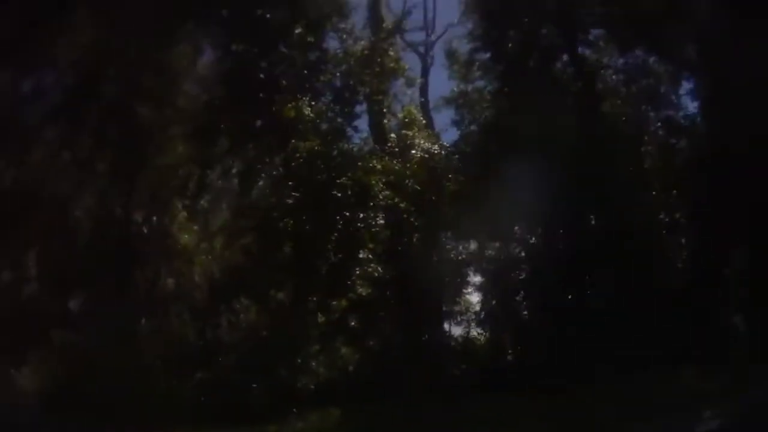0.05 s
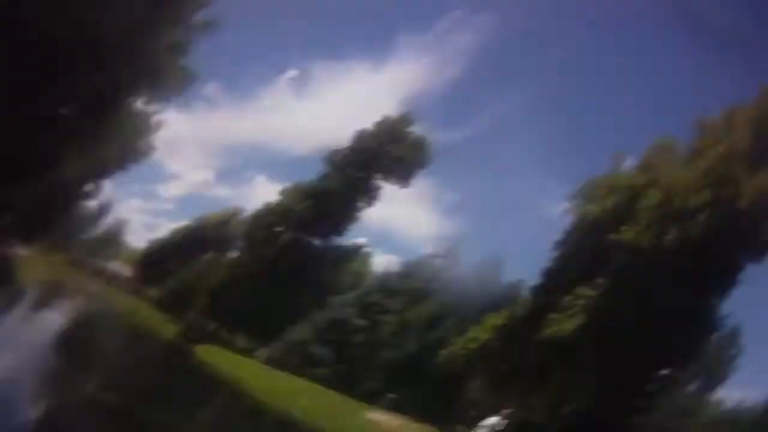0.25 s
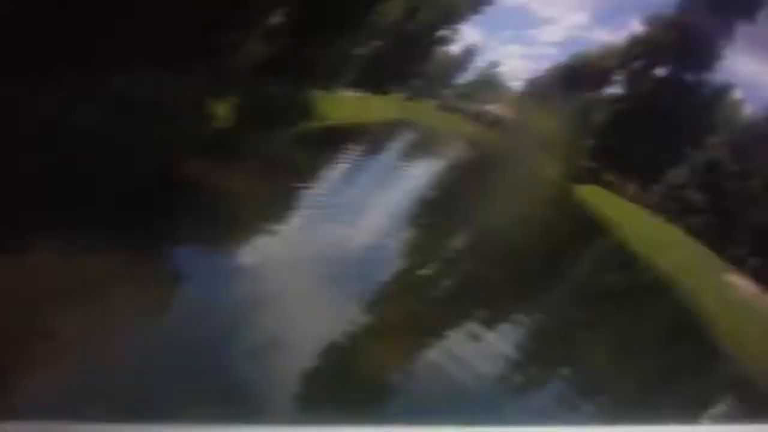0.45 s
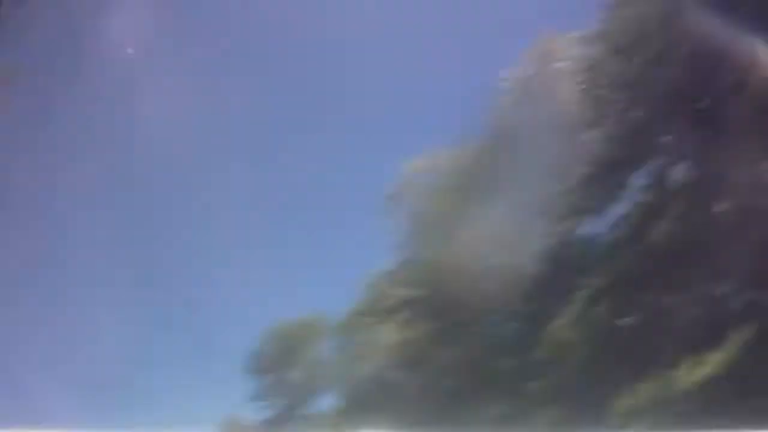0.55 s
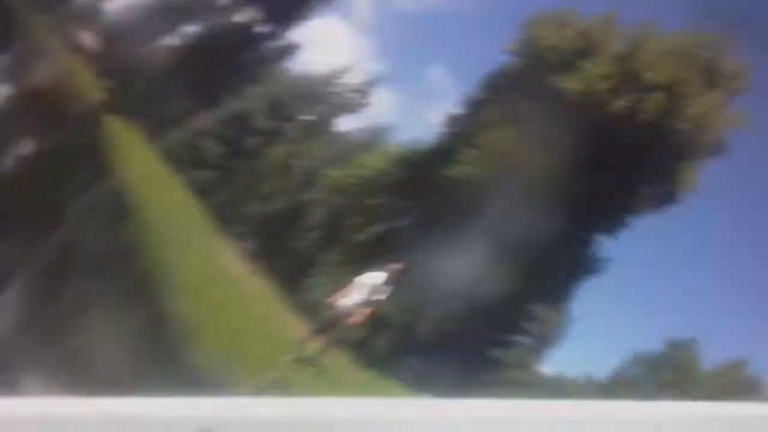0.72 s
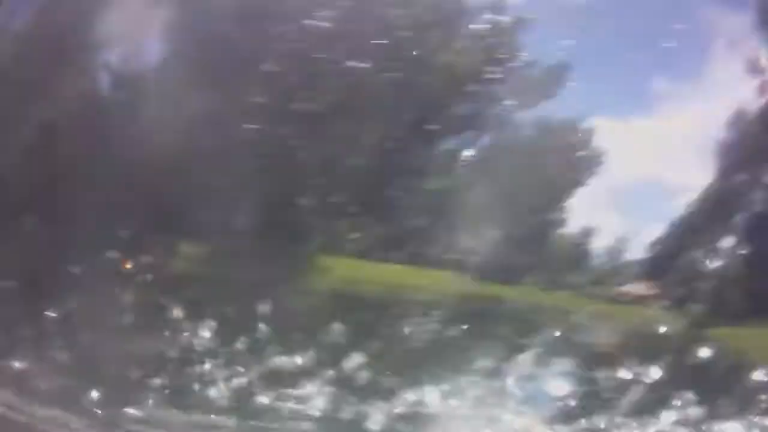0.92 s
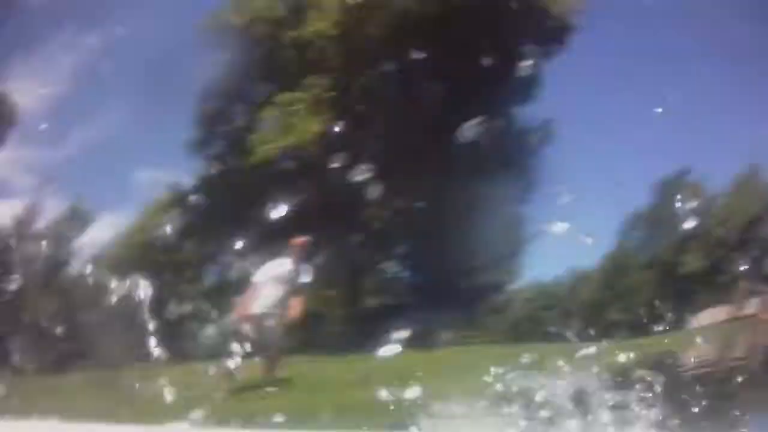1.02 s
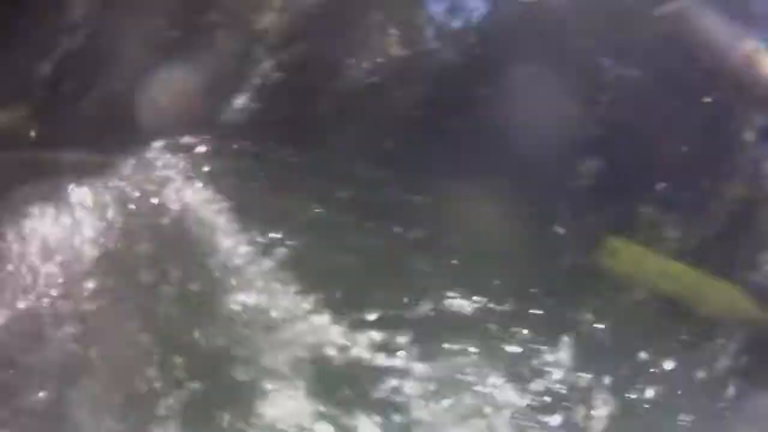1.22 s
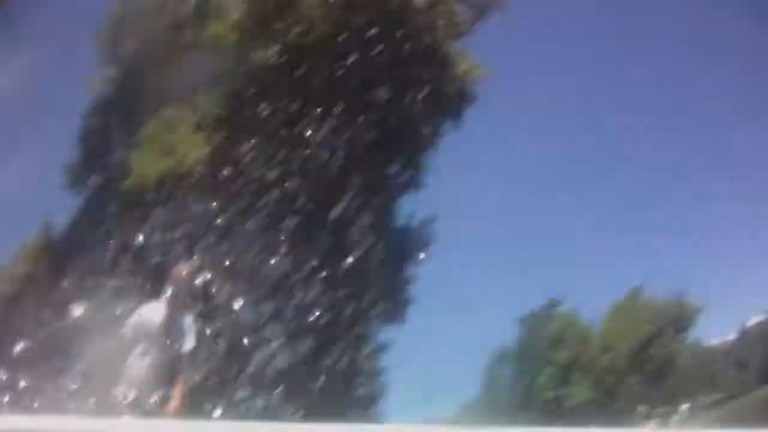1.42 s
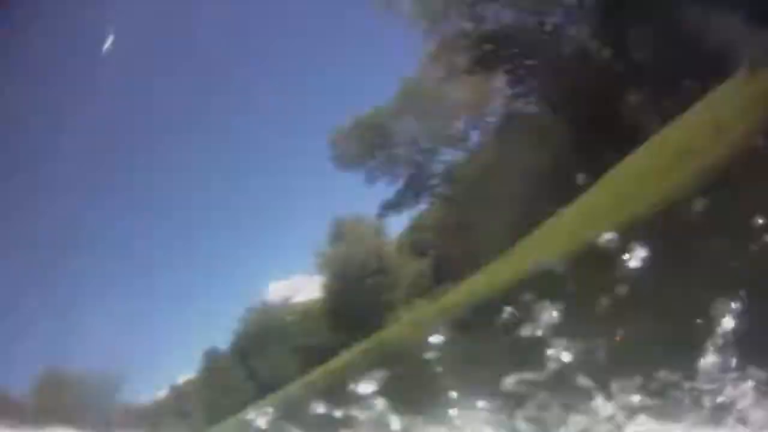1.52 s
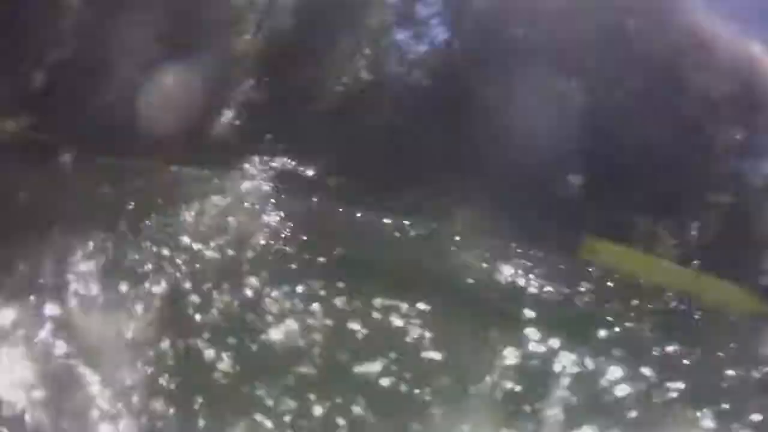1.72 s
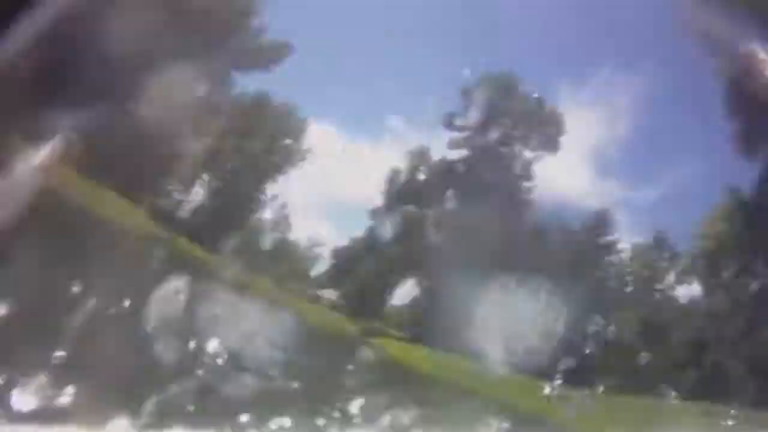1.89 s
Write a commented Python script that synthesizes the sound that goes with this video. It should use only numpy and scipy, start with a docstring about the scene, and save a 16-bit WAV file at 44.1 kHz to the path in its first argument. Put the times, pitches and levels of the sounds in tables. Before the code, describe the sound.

Water slaps a plastic shell skipping over a pond, very close. Near silence with tiny ticks until 0.2 s, then a rattling burst of slaps, with a short sinking gulp at 0.25. Fluttering wind swells 0.35-0.7. The loudest, clipped smack hits at 0.75, crackly slaps at 0.98 and 1.03. Then faint gurgle, spray and wavering motor hum; plops at 1.47-1.51, small splash near 1.75, gurgle at 1.9.

```python
"""Pond, right at the water: a camera rides on a small motor-driven boat that skips over the surface.
Each contact slaps the microphone port (pressure, suction), ticks the plastic shell (ringing modes)
and churns water over the port (noise choked in snatches); trapped air gulps on a sinking note.
Between contacts air buffets the port (coloured noise), spray patters (random impulses), bubbles ring,
the hull thumps and gurgles, the wake splashes and the motor hums faintly (shaft-rate harmonics)."""
import sys
import numpy as np
from scipy import signal
from scipy.fft import rfft, irfft
from scipy.io import wavfile
from scipy.ndimage import uniform_filter1d

SR = 44100
rng = np.random.default_rng(int(sys.argv[2]) if len(sys.argv) > 2 else 0)


def store_wav(level_fs):
    """Save 16-bit WAV to argv[1]."""
    pcm = np.round(np.clip(np.atleast_2d(level_fs), -1, 1) * 32767)
    wavfile.write(sys.argv[1], SR, pcm.T.astype(np.int16))


N = 85995


def undb(db):
    """Decibels to amplitude gain."""
    return 10 ** (np.asarray(db) / 20)


def unit(x):
    """Scale to rms 1."""
    return x / np.sqrt(np.mean(x ** 2))


def clock(start_s=0):
    """Seconds since start_s, negative before it."""
    return np.arange(N) / SR - start_s


def fader(curve):
    """Gain along (time_s, level_db) points, linear in dB."""
    return undb(np.interp(clock(), *np.array(curve).T))


def colour(x, spectrum):
    """Minimum-phase filter through (freq_hz, relative_db) points; rms 1."""
    hz, db = np.array(spectrum).T
    bin_hz = np.arange(N + 1) * SR / (2 * N)
    gain = undb(np.interp(np.log(bin_hz + 1), np.log(hz), db))
    # folding the cepstrum onto positive time makes the filter causal
    cepstrum = irfft(np.log(gain))
    cepstrum[1:N] *= 2
    cepstrum[N + 1:] = 0
    response = np.exp(rfft(cepstrum))
    return unit(irfft(rfft(x, 2 * N) * response)[:N])


def noise(spectrum):
    """Coloured Gaussian noise, rms 1."""
    return colour(rng.standard_normal(N), spectrum)


def walk(points_per_s):
    """Straight lines between Gaussian points; spread near 1."""
    return np.interp(clock() * points_per_s, np.arange(N), rng.standard_normal(N))


# steady noise floor: freq_hz, relative_db
FLOOR_SPECTRUM = [(30, 1), (90, 1), (300, -17), (600, -5.5), (1200, -16), (3000, -28.5), (5000, -49),
                  (6800, -14), (9000, -19), (15500, -19)]
# its left-right difference: freq_hz, relative_db
FLOOR_SIDE_SPECTRUM = [(100, -31), (1000, -5), (3000, -16), (8000, -6), (15000, 1)]
FLOOR_DB, FLOOR_SIDE_DB = -69, -78


def noise_floor():
    """Steady hiss as coloured noise; returns mid, side."""
    return undb(FLOOR_DB) * noise(FLOOR_SPECTRUM), undb(FLOOR_SIDE_DB) * noise(FLOOR_SIDE_SPECTRUM)


# spectra of airflow, hiss and buffeting: freq_hz, relative_db
AIRFLOW_SPECTRUM = [(20, -19), (65, -16), (110, -3.5), (210, -4.5), (330, 0), (420, -9), (640, -16),
                    (1000, -34.5), (2500, -41), (14000, -83)]
HISS_SPECTRUM = [(300, -13), (900, 1.5), (1500, 0.5), (2450, 1), (3300, -7.5), (4300, -7.5), (4900, -24),
                 (7000, -24.5), (14000, -54)]
BUFFET_SPECTRUM = [(20, -46.5), (60, -1), (110, 4), (200, 3), (350, -20), (560, -20), (900, -32.5),
                   (3000, -57)]
# their levels: time_s, level_db
AIRFLOW_LEVEL = [(0, -80), (.09, -66), (.12, -53.5), (.19, -49.5), (.22, -49), (.32, -41.5), (.345, -31.5),
                 (.385, -41), (.42, -32.5), (.468, -26.5), (.505, -33), (.54, -37), (.61, -37.5),
                 (.668, -31.5), (.69, -41), (.74, -48), (.92, -41.5), (.96, -45.5), (1.1, -49), (1.25, -55),
                 (1.95, -90)]
HISS_LEVEL = [(.08, -76), (.14, -58.5), (.31, -58.5), (.36, -48.5), (.46, -52), (.56, -52.5), (.665, -46),
              (.695, -71), (.92, -61), (.97, -50.5), (1.1, -67), (1.25, -74)]
BUFFET_LEVEL = [(0, -74), (.3, -47), (.71, -51), (.85, -34.5), (.92, -38), (.96, -33), (1.09, -45),
                (1.18, -39), (1.27, -48.5), (1.33, -43), (1.42, -54), (1.54, -66.5), (1.62, -53),
                (1.69, -39), (1.77, -56), (1.95, -72)]
AIR_FLUTTER_DB = 4


def wind():
    """Air rushing past the port: fluttering flow, hiss and low buffeting."""
    flow = fader(AIRFLOW_LEVEL) * noise(AIRFLOW_SPECTRUM) * undb(AIR_FLUTTER_DB * walk(70))
    hiss = fader(HISS_LEVEL) * noise(HISS_SPECTRUM)
    buffet = fader(BUFFET_LEVEL) * noise(BUFFET_SPECTRUM)
    return flow + hiss + buffet


DROPS_PER_S, DROP_SPREAD_DB = 3500, 4
MIST_SHARE = 0.44  # amplitude against the drops
PATTER_FLUTTER_DB = 3.5


def patter(spectrum):
    """Countless droplets of uneven size as random impulses, over a fine mist of noise."""
    hits = rng.random(N) < DROPS_PER_S / SR
    size_db = DROP_SPREAD_DB * np.minimum(rng.exponential(size=N), 5)
    drops = hits * rng.choice([-1, 1], N) * undb(size_db)
    mixed = unit(colour(drops, spectrum) + MIST_SHARE * noise(spectrum))
    return mixed * undb(PATTER_FLUTTER_DB * walk(60))


# falling spray: freq_hz, relative_db
SPRAY_SPECTRUM = [(530, -30), (900, -34), (1620, 2), (1800, -23), (2360, 5.5), (2820, -2.5), (3650, -1),
                  (4160, 6), (4850, -11), (5780, -3), (7150, -6.5), (10700, -30), (15000, -42)]
# falling spray: time_s, level_db
SPRAY_LEVEL = [(0, -71), (.09, -74), (.13, -64), (.21, -55), (.32, -62.5), (.72, -68.5), (.93, -61),
               (1.0, -62), (1.08, -51.5), (1.15, -50.5), (1.22, -55), (1.3, -62.5), (1.36, -52.5),
               (1.44, -56.5), (1.62, -54), (1.69, -54), (1.745, -42), (1.81, -56.5), (1.95, -57.5)]
SPRAY_SIDE = 0.05  # amplitude against the mid


def spray():
    """Drops patter back onto the pond, with a faint independent side; returns mid, side."""
    level = fader(SPRAY_LEVEL)
    return level * patter(SPRAY_SPECTRUM), SPRAY_SIDE * level * patter(SPRAY_SPECTRUM)


BUBBLE_LOW_HZ, BUBBLE_HIGH_HZ = 1068, 5130
BUBBLE_DECAY_CYCLES, BUBBLE_RISE = 10.2, 0.0397  # rise: phase gained per decay time, as a share
BUBBLE_DB = -5  # against the spray level
BUBBLE_TILT_DB, BUBBLE_RANGE_DB = 10, 27


def bubbles():
    """Small bubbles of every size ring briefly and rise in pitch, as loud as the spray allows."""
    out = np.zeros(N + 2048)
    t = np.arange(2048) / SR
    for when, smallness, faintness in rng.random((260, 3)):
        hz = BUBBLE_LOW_HZ * (BUBBLE_HIGH_HZ / BUBBLE_LOW_HZ) ** smallness
        age = t * hz / BUBBLE_DECAY_CYCLES
        envelope = np.exp(-age) * (1 - np.exp(-6 * age))
        ring = np.sin(2 * np.pi * hz * t * (1 + BUBBLE_RISE * np.minimum(age, 4))) * envelope
        start = int(when * N)
        level_db = BUBBLE_TILT_DB * smallness - BUBBLE_RANGE_DB * faintness
        out[start:start + len(t)] += undb(level_db) * ring
    return fader(SPRAY_LEVEL) * undb(BUBBLE_DB) * unit(out[:N])


# hard drops on the shell: start_s, level_db, pitch_hz
SHELL_TICKS = [(.0575, -44, 3600), (.0955, -39, 6500), (0.1084, -39, 2614), (0.1171, -23, 3140),
               (0.2127, -18.5, 4140), (.2198, -27, 6400), (.2222, -12, 2820), (.2282, -24, 4460),
               (0.235, -26, 3720), (0.2805, -20, 5030), (0.2941, -18.5, 7200), (0.3315, -25, 2280),
               (0.7535, -22.5, 4000), (0.773, -19, 3000), (0.7808, -28, 3500), (.8778, -24.5, 2930),
               (0.9318, -36.5, 2400), (.9572, -33, 9500), (1.0008, -22, 6540), (1.027, -7, 3570),
               (1.0322, -15.5, 3230), (1.069, -22.5, 3000), (1.0866, -27.5, 5950), (1.2170, -35.5, 3000),
               (1.3100, -37, 4070), (1.3420, -33.5, 2470), (1.3593, -29.5, 3500), (1.549, -31.5, 3970)]
# modes of the plastic shell: freq_hz, level_db, t60_s
SHELL_MODES = [(1510, -3, 0.016), (2430, -3.5, 0.011), (2813, 0.5, 0.011), (3580, -3, 0.005),
               (4120, -7, 0.013), (4540, -3.5, 0.0059), (5600, -6, 0.0046), (6280, -10.5, 0.011),
               (7000, 3.5, 0.0045)]
MODE_SCATTER_DB, MODE_DETUNE = 2, .02  # per tick; detune as a share of freq_hz
TICK_FOCUS_DB_PER_OCTAVE = 9.5  # fall of the modes away from pitch_hz
CRACK_DB, CRACK_DECAY_S = -22.5556, 0.0013
TICK_ATTACK_S = .00025


def ticks():
    """Hard drops crack on the shell and ring its modes, a little differently each time."""
    out = np.zeros(N)
    hz, mode_db, t60_s = np.array(SHELL_MODES).T[:, :, None]
    t = np.arange(2048) / SR
    decay = np.exp(-np.log(1000) * t / t60_s)
    for start_s, level_db, pitch_hz in SHELL_TICKS:
        detune = 1 + MODE_DETUNE * rng.standard_normal(hz.shape)
        scatter_db = MODE_SCATTER_DB * rng.standard_normal(hz.shape)
        focus_db = -TICK_FOCUS_DB_PER_OCTAVE * np.abs(np.log2(hz / pitch_hz))
        gain = undb(mode_db + scatter_db + focus_db)
        tones = np.sin(2 * np.pi * (hz * detune * t + rng.random(hz.shape)))
        ring = (gain * tones * decay).sum(axis=0)
        crack = undb(CRACK_DB) * rng.standard_normal(len(t)) * np.exp(-t / CRACK_DECAY_S)
        tick = (ring / np.abs(ring).max() + crack) * (1 - np.exp(-t / TICK_ATTACK_S))
        out += undb(level_db) * np.interp(clock(start_s), t, tick, left=0, right=0)
    return out


# soft drops on the port: start_s, level_db, pitch_hz
PORT_PLOPS = [(0.1326, -26, 480), (.1520, -28, 450), (1.4630, -22, 760), (1.467, -24.5, 480),
              (1.4719, -19.5, 466), (1.4787, -14, 2050), (1.4833, -15.5, 880), (1.4924, -21.5, 356),
              (1.4957, -19, 1510), (1.5081, -18, 306), (1.5104, -23.5, 810), (1.597, -34, 820),
              (1.666, -31, 600)]
# snap of a plop: freq_hz, relative_db
SNAP_SPECTRUM = [(200, -6), (800, -1), (2500, -1.5), (4500, -10), (8000, -28), (16000, -46)]
PLOP_DECAY_CYCLES, PLOP_SNAP_DB = 0.67, -16.5


def plops():
    """Drops on the port: a noise snap and a heavily damped wobble."""
    out = np.zeros(N)
    for start_s, level_db, pitch_hz in PORT_PLOPS:
        t = np.maximum(clock(start_s), 0)
        snap = undb(PLOP_SNAP_DB) * noise(SNAP_SPECTRUM) * (t > 0)
        wobble = -np.sin(2 * np.pi * pitch_hz * t)
        out += undb(level_db) * (snap + wobble) * np.exp(-pitch_hz * t / PLOP_DECAY_CYCLES)
    return out


# water over the port: start_s, length_s, churn_db, crackle_db
PORT_WASHES = [(.212, 0.023, -28.5, -57), (0.252, 0.017, -24.5, -37.5), (0.276, 0.022, -33.5, -34.5),
               (0.745, 0.039, -24, -29.5), (0.797, 0.065, -38, -44.5), (0.883, 0.011, -25, -46.5),
               (0.973, 0.0388, -27.5, -34), (1.018, 0.041, -25, -37), (1.064, 0.018, -35, -57)]
# churning and crackling water: freq_hz, relative_db
CHURN_SPECTRUM = [(20, -13.5), (60, -16), (120, 5), (250, -1.5), (500, -14.5), (900, -26.5), (2000, -33.5),
                  (8000, -66)]
CRACKLE_SPECTRUM = [(200, 9), (700, 5), (1500, 0.5), (3000, -5), (5200, -8.5), (6800, -9.5), (10000, -17.5),
                    (16000, -26)]
WASH_ATTACK_S, WASH_RELEASE_S = 0.00067, 0.0071
CHOKE_POINTS_PER_S, CHOKE_THRESHOLD, CHOKE_EDGE_S = 410, 0.79, .0002
SPIT_POINTS_PER_S, SPIT_DB = 550, 7
CRACKLE_SIDE = 0.32


def washes():
    """Churning water crackles in short spits and seals the port for instants; returns mid, side."""
    churn_gain, crackle_gain = np.zeros(N), np.zeros(N)
    for start_s, length_s, churn_db, crackle_db in PORT_WASHES:
        t = clock(start_s)
        release = np.exp(-np.maximum(t - length_s, 0) / WASH_RELEASE_S)
        shape = np.clip(t / WASH_ATTACK_S, 0, 1) * release
        churn_gain += undb(churn_db) * shape
        crackle_gain += undb(crackle_db) * shape
    pressure = unit(np.tanh(0.86 * noise(CHURN_SPECTRUM)))
    is_open = 1. * (walk(CHOKE_POINTS_PER_S) < CHOKE_THRESHOLD)
    port_open = uniform_filter1d(is_open, max(1, int(CHOKE_EDGE_S * SR)))
    spits = undb(SPIT_DB * np.clip(walk(SPIT_POINTS_PER_S), -2, 1.5))
    # crackle follows the churn and leaks a little through the sealed port
    crackle = crackle_gain * unit((np.abs(pressure) * port_open + 0.054) * spits)
    mid = churn_gain * pressure * port_open + crackle * noise(CRACKLE_SPECTRUM)
    side = CRACKLE_SIDE * crackle * rng.standard_normal(N)
    return mid, side


# slaps on the port: start_s, level_db, width_ms, suction_db (against the slap)
PORT_SLAPS = [(0.2142, -21, 1.3, -38), (0.2288, -12.5, 0.13, -16), (0.2495, -16, 0.53, 5.5),
              (0.2541, -8, .6, -17), (0.2607, -18, 0.27, 8.5), (0.2658, -12, 1.44, -14),
              (0.7471, -11, 0.15, -1), (0.7491, 2.5, 0.2, -4), (0.7667, -14.5, 0.3, -3),
              (0.7737, -11, 0.41, -40), (0.798, -26, 0.9, -2), (0.8133, -13, 1.1, -9.5),
              (0.842, -16, 0.67, -8), (.8890, -22, 1.5, -34), (0.9769, -8, 0.1, -36),
              (0.9798, -3.5, 0.4, -13), (1.0250, -5.5, 0.46, -6.5)]
SUCTION_DELAY_S = 0.00311
SUCTION_WIDTH, SLAP_RISE = 0.8, 0.46  # shares of the slap's and of the spike's width
SLAP_CRACKLE_DB = -22


def spike(start_s, width_s):
    """Pressure pulse with a fast rise and a slower fall."""
    t = clock(start_s) / width_s
    return np.exp(-np.where(t < 0, (t / SLAP_RISE) ** 2, np.abs(t) ** 1.77))


def slaps():
    """A spike of pressure as water closes the port, then suction as it lets go; both crackle."""
    pressure = np.zeros(N)
    for start_s, level_db, width_ms, suction_db in PORT_SLAPS:
        width_s = width_ms / 1000
        push = spike(start_s, width_s)
        pull = undb(suction_db) * spike(start_s + SUCTION_DELAY_S, SUCTION_WIDTH * width_s)
        pressure += undb(level_db) * (push - pull)
    crackle = np.sqrt(np.abs(pressure)) * noise(CRACKLE_SPECTRUM)
    return pressure + undb(SLAP_CRACKLE_DB) * crackle


GULP_S, GULP_LENGTH_S, GULP_DB = .2545, .019, -14.5
GULP_START_HZ, GULP_END_HZ, GULP_ROUGH = 778, 421, .2  # rough: spread of log pitch
GULP_FLUTTER_DB, GULP_POWER = 4, 1.6


def gulp():
    """Trapped air: an uneven, rasping, sinking note, its wave bent by a power law."""
    age = np.clip(clock(GULP_S) / GULP_LENGTH_S, 0, 1)
    glide_hz = GULP_START_HZ * (GULP_END_HZ / GULP_START_HZ) ** age
    hz = glide_hz * np.exp(GULP_ROUGH * walk(1000))
    wave = np.sin(2 * np.pi * np.cumsum(hz * (age > 0)) / SR)
    bent = np.sign(wave) * np.abs(wave) ** GULP_POWER
    level = undb(GULP_DB + GULP_FLUTTER_DB * walk(700))
    return -level * bent * np.sqrt(4 * age * (1 - age))


# thumps of air and water on the hull: centre_s, level_db, pitch_hz
HULL_BLOOPS = [(0.395, -22, 123), (0.679, -22, 190), (0.85, -18.5, 111), (1.131, -32, 125),
               (1.192, -33.5, 198), (1.223, -34, 108), (1.241, -35, 100), (1.316, -30, 104),
               (1.441, -32.5, 114), (1.723, -33, 102)]
BLOOP_CYCLES = 0.68


def bloops():
    """Low, rounded thumps on the hull: sines under a Gaussian envelope."""
    out = np.zeros(N)
    for centre_s, level_db, pitch_hz in HULL_BLOOPS:
        cycles = pitch_hz * clock(centre_s)
        out += undb(level_db) * np.sin(2 * np.pi * cycles) * np.exp(-(cycles / BLOOP_CYCLES) ** 2)
    return out


# gurgling along the hull: freq_hz, relative_db
SLOSH_SPECTRUM = [(100, -44), (180, 4.5), (300, 0), (480, 3), (680, 2), (850, -12.5), (1400, -21.5),
                  (2000, -41), (8000, -39)]
# gurgling along the hull: time_s, level_db
SLOSH_LEVEL = [(.9, -95), (.96, -65), (1.04, -34), (1.11, -41), (1.18, -48), (1.26, -60.5), (1.62, -58),
               (1.72, -44.5), (1.76, -64), (1.888, -67), (1.905, -38), (1.95, -50.5)]
SLOSH_FLUTTER_DB = 2.5


def slosh():
    """Hollow gurgling along the hull: fluttering coloured noise."""
    return fader(SLOSH_LEVEL) * noise(SLOSH_SPECTRUM) * undb(SLOSH_FLUTTER_DB * walk(60))


# hum of the motor: time_s, level_db
HUM_LEVEL = [(.3, -95), (.98, -64), (1.08, -44.5), (1.19, -60), (1.27, -67.5), (1.36, -48.5), (1.45, -61),
             (1.55, -68.5), (1.68, -51.5), (1.85, -53), (1.95, -49)]
# multiples 1, 2, .. of the shaft rate: relative_db
SHAFT_ORDERS = [1, 6, -2.5, -13, -50.5, -10, -38, -32, -36, -0.5, -11, -7]
# shaft rate, sagging as the hull digs in: time_s, rate_hz
SHAFT_RATE = [(1.059, 217), (1.14, 244.8), (1.211, 253), (1.28, 272.7), (1.349, 255.6), (1.43, 243.2),
              (1.551, 186.6), (1.609, 205.2), (1.669, 228.7), (1.779, 242.3), (1.855, 250.6), (1.95, 239)]
SHAFT_WOBBLE, ORDER_FLUTTER_DB = .006, 3.5  # wobble as a share of rate_hz


def motor():
    """The drive hums on fluttering multiples of its wobbling shaft rate."""
    rate_hz = np.interp(clock(), *np.array(SHAFT_RATE).T) * (1 + SHAFT_WOBBLE * walk(80))
    turns = np.cumsum(rate_hz) / SR
    hum = np.zeros(N)
    for order, order_db in enumerate(SHAFT_ORDERS, 1):
        gain = undb(order_db + ORDER_FLUTTER_DB * walk(24.46))
        hum += gain * np.sin(2 * np.pi * (order * turns + rng.random()))
    return fader(HUM_LEVEL) * unit(hum)


# wake splashing behind: freq_hz, relative_db
WAKE_SPECTRUM = [(100, -13.5), (250, -3), (600, 1.5), (1000, -6.5), (1600, -5), (2500, -8.5), (5000, -18),
                 (12000, -53)]
# wake splashing behind: time_s, level_db
WAKE_LEVEL = [(1.0, -48), (1.1, -55.5), (1.27, -79), (1.4, -49), (1.54, -81), (1.65, -66), (1.67, -52),
              (1.745, -42.5), (1.82, -48), (1.95, -45)]


def wake():
    """Splashing droplets behind the boat, silent before the first level point."""
    started = clock(WAKE_LEVEL[0][0]) > 0
    return fader(WAKE_LEVEL) * patter(WAKE_SPECTRUM) * started


def scene():
    """Nearly mono: left and right differ only by faint floor, spray and crackle."""
    floor_mid, floor_side = noise_floor()
    spray_mid, spray_side = spray()
    wash_mid, wash_side = washes()
    air = floor_mid + wind()
    water = spray_mid + bubbles() + wake()
    port = plops() + wash_mid + slaps() + gulp()
    boat = ticks() + bloops() + slosh() + motor()
    mid = air + water + port + boat
    side = floor_side + spray_side + wash_side
    return np.array([mid + side, mid - side])


TOP_HZ = 15600


def record(dry):
    """The camera clips at full scale, then a steep low-pass cuts the top."""
    low_pass = signal.ellip(8, .2, 70, TOP_HZ, fs=SR, output="sos")
    return signal.sosfilt(low_pass, np.clip(dry, -1, 1))


dry = scene()
out = record(dry)
store_wav(out)
```